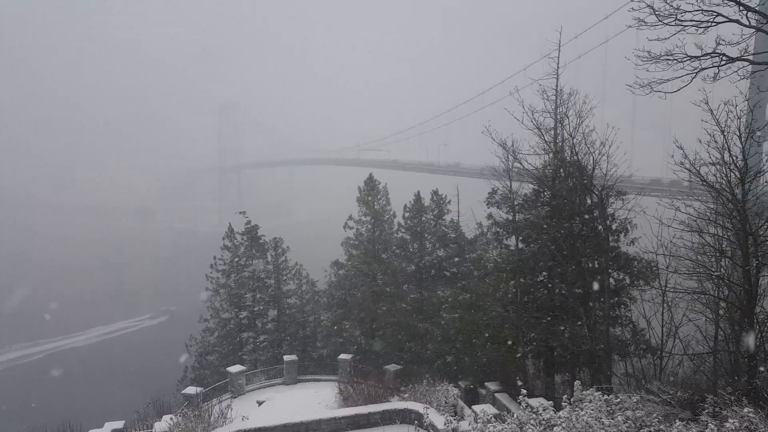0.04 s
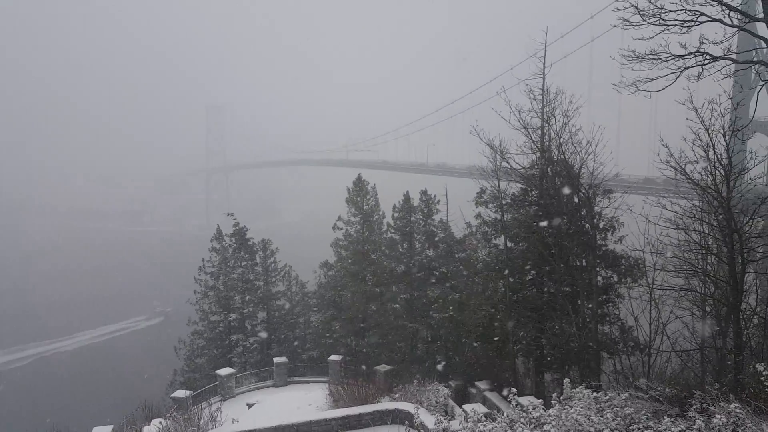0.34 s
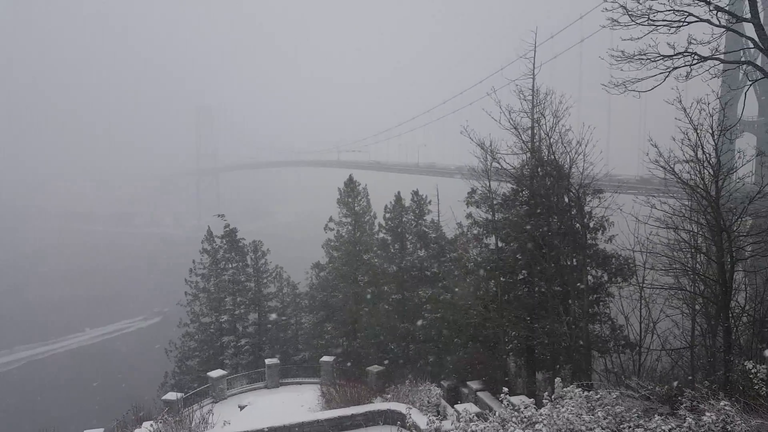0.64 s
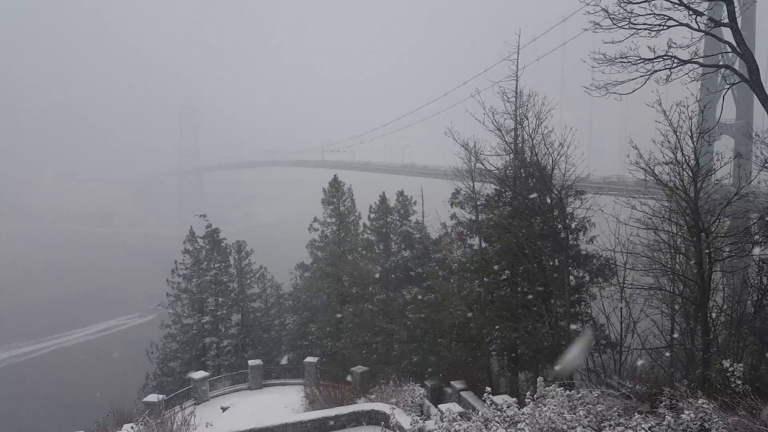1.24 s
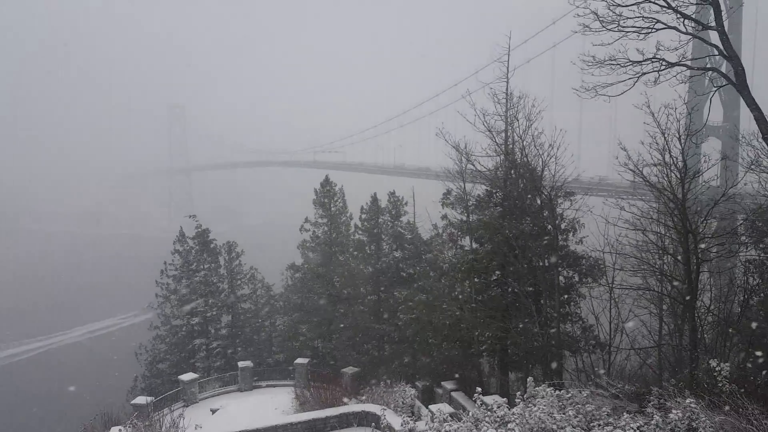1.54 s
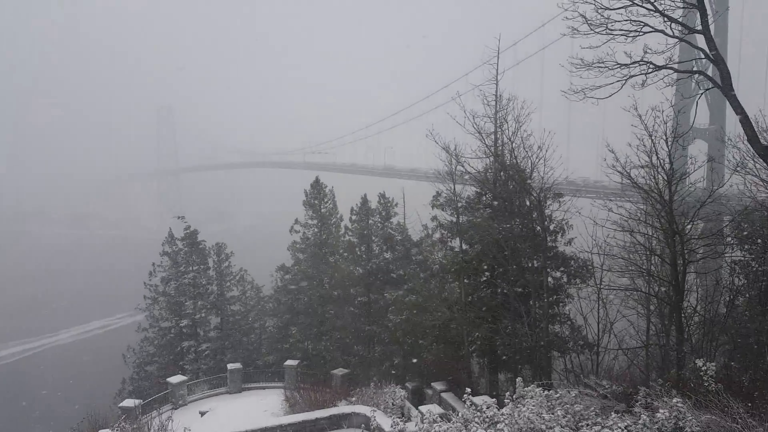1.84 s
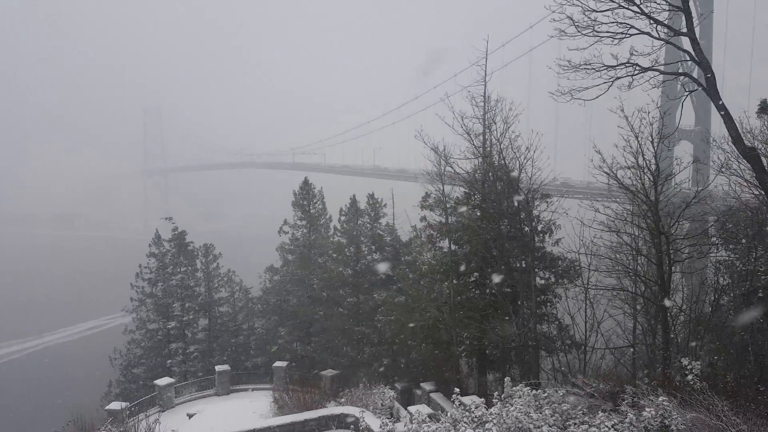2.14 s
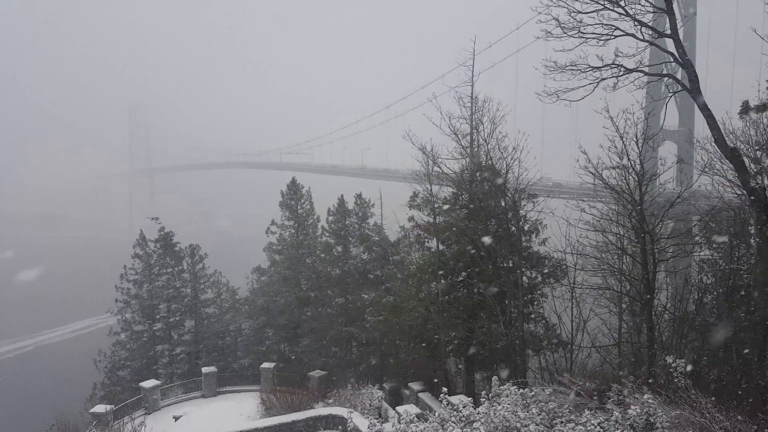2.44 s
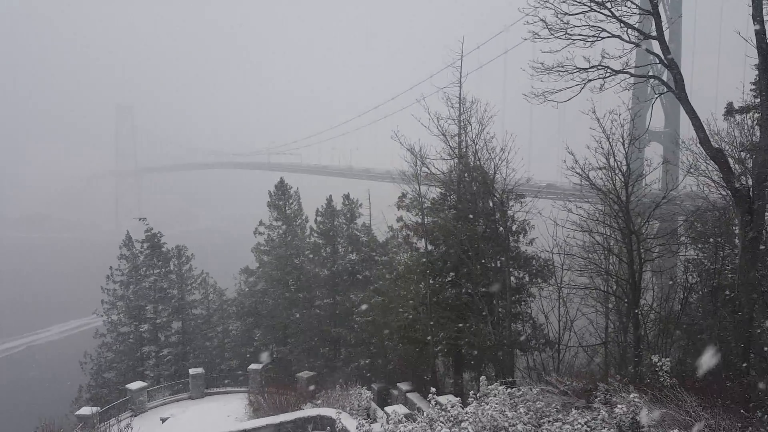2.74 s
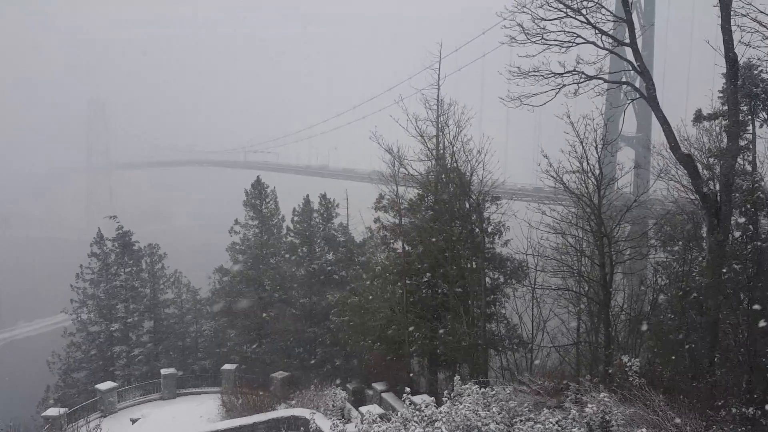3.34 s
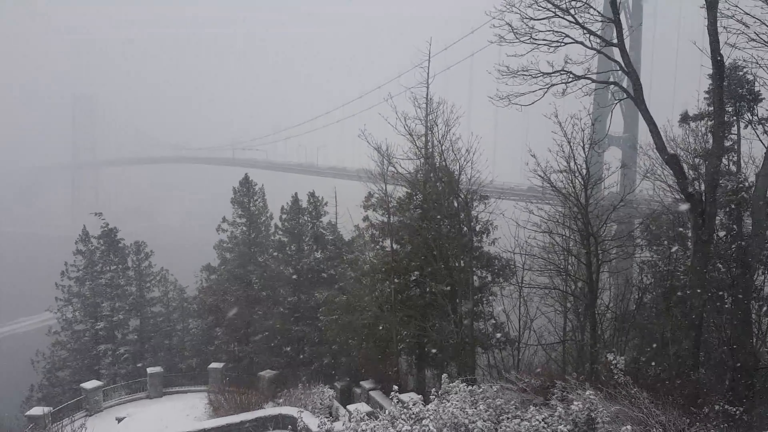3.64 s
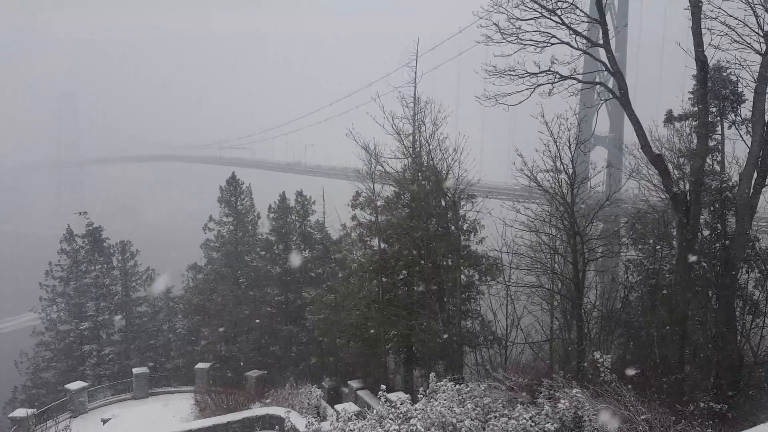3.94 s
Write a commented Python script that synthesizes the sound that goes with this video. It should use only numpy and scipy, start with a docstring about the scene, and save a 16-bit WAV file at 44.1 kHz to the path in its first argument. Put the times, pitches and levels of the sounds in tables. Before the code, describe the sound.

A ship's horn holds one low note from the start, grows fuller from about 1.2 seconds and stops near 2.4, leaving a faint shore echo. A low engine throb, rumbling wind and distant traffic run throughout. Snowflakes tick lightly close by, with soft rustles around 1, 2.3 and 3.6 seconds. Two faint, far whines, one sinking and one rising, pass between 2.4 and 3.4 seconds.

```python
"""A ship's horn holds one low note across a foggy inlet, swells and stops, leaving a faint shore echo.
The horn is a stack of pure tones; under it the ship's engine throbs on four low notes.
Close by, snowflakes tick as they land and something rustles softly three times.
Behind it all, wind and far bridge traffic make a wash of noise, with two faint whines near the end."""
import sys
import numpy as np
from scipy import signal
from scipy.fft import rfft, irfft
from scipy.io import wavfile
from scipy.ndimage import uniform_filter1d

SR = 44100
rng = np.random.default_rng(int(sys.argv[2]) if len(sys.argv) > 2 else 0)


def int16_out(signal):
    """Quantize to a 16-bit WAV file."""
    q = np.round(np.clip(np.atleast_2d(signal).T, -1, 1) * 32767)
    wavfile.write(sys.argv[1], SR, q.astype(np.int16))


N = 176400
T = np.arange(N) / SR

# The horn's note, steady until it sags as the air is shut off: time_s, pitch_hz
HORN_PITCH = [(0, 124.85), (1.35, 124.85), (1.55, 124.72), (2.3, 124.7), (2.37, 123.6), (2.5, 124.2)]
# Its harmonics (tones at 1, 2, 3... times the pitch): hollow_level_db, full_level_db
HORN_HARMONICS = [(-24.5, -30), (-29.5, -15.5), (-36.5, -29.5), (-38.5, -25), (-40.5, -31), (-38.5, -36.5),
                  (-49, -45), (-48, -60), (-53.5, -56), (-64.5, -51.5), (-59, -57), (-67.5, -57.5)]
# The tone fills out as the path over the water changes: time_s, fullness (0 hollow, 1 full)
HORN_FULLNESS = [(0, 0), (.7, 0.069), (1.05, 0.16), (1.27, 0.44), (1.5, 0.61), (1.75, 0.79), (2.0, 0.84),
                 (2.3, 0.9)]
# One harmonic dips as direct and reflected sound cancel: middle_s, pitch_hz, half_length_s, dip_db
HORN_DIPS = [(0.058, 750, .28, -12.5), (0.204, 375, 0.25, -13.5), (0.651, 500, 0.28, -10),
             (0.777, 250, 0.031, -15.5), (0.993, 875, 0.11, -11.5), (1.398, 375, 0.13, -5),
             (1.58, 625, .27, -12.5), (1.717, 750, 0.39, -13.5), (1.8, 875, 0.4, -7.5),
             (1.85, 1250, .15, -10), (2.444, 375, .06, -13.5)]

def horn():
    """Pure tones on one note; each wavers in the moving air, and the high ones die away first."""
    shut_s, closing_s, reflection_s = 2.315, .085, .095
    cycles = np.cumsum(curve(HORN_PITCH)) / SR
    fullness, note_hz = curve(HORN_FULLNESS), HORN_PITCH[0][1]
    # The direct sound stops first; a reflection carries on a moment longer.
    shut = np.clip((T - shut_s) / closing_s, 0, 1)
    dying_s = np.maximum(T - shut_s - reflection_s, 0)
    out = np.zeros(N)
    for k, (hollow_db, full_db) in enumerate(HORN_HARMONICS, 1):
        hz = k * note_hz
        db = hollow_db + (full_db - hollow_db) * fullness
        db += (.3 + .0008 * hz) * wander(5)
        for middle_s, dip_hz, half_length_s, dip_db in HORN_DIPS:
            if round(dip_hz / note_hz) == k:
                db += dip_db * np.exp(-((T - middle_s) / half_length_s) ** 2)
        drop_db, fade_db_per_s = 1.2 + .014 * hz, 70 + .28 * hz
        db -= shut * drop_db + dying_s * fade_db_per_s
        phase = 2 * np.pi * (k * cycles + rng.random())
        waver = .06 * np.sqrt(k) * wander(2.6)
        out += amp(db) * np.sqrt(2) * np.sin(phase + waver)
    return out


def shore_echo(sound, level_db=-29, fade_s=2.5):
    """The wooded shore sends back a faint echo that falls 60 dB in fade_s."""
    tail = rng.standard_normal(N) * amp(-60 * T / fade_s)
    return amp(level_db) * signal.fftconvolve(sound, tail / np.linalg.norm(tail))[:N]


# The engine's notes: pitch_hz, throb_rate_hz, base_level_db
ENGINE_NOTES = [(97.1, 2.5, -35.5), (143.4, 6, -30.5), (157.4, 3.4, -40), (193, 5, -39.5)]
# How they swell and sink together: time_s, gain_db
ENGINE_SWELL = [(0, -10), (.25, 3), (.75, 5.5), (1.3, 5), (1.6, -0.5), (1.85, -6), (2.0, -2), (2.3, -2),
                (2.57, -0.5), (2.67, 0.5), (3.25, 1), (3.35, 8), (3.46, -8.5), (3.58, -2), (3.67, -3),
                (4, 2)]

def engine(steady_share=.45):
    """The turning engine drones on low notes, part steady and part throbbing at random."""
    out = np.zeros(N)
    for hz, throb_hz, db in ENGINE_NOTES:
        throb = evened(wander(throb_hz) + 1j * wander(throb_hz))  # shakes both level and phase
        strength = np.sqrt(steady_share) + np.sqrt(1 - steady_share) * throb
        note = strength * np.exp(2j * np.pi * (hz * T + rng.random()))
        out += amp(db) * evened(note.real)
    return out * amp(curve(ENGINE_SWELL))


# The flakes that land clearly: start_s, level_db (before SNOW_TONE)
SNOW_TICKS = [(1.286, -33.5), (1.532, -44), (1.574, -53), (1.593, -54), (1.636, -44), (1.763, -44.5),
              (2.859, -50), (2.96, -39), (3.3675, -38), (3.385, -42), (3.7616, -29.5)]
# The bright tone of every tick: frequency_hz, gain_db
SNOW_TONE = [(500, -6), (2500, 11), (4200, 12), (6500, 8), (9000, 9), (12000, 2), (16000, 1)]

def snow(crumble_s=.0006, faint_per_s=6, faint_db=-59):
    """Flakes strike something close by: a few snap and crumble clearly among many faint ticks."""
    t, out = T[:400], np.zeros(N)
    for start_s, db in SNOW_TICKS:
        snap = t == 0
        crumble = .2 * rng.standard_normal(len(t)) * np.exp(-t / crumble_s)
        tick = snap + crumble
        add(out, start_s, amp(db) * tick / np.linalg.norm(tick))
    out += amp(faint_db) * rng.standard_normal(N) * (rng.random(N) < faint_per_s / SR)
    return coloured(out, SNOW_TONE)


# Soft brushes in three groups: start_s, rise_s, decay_s, level_db (before the grain)
BRUSHES = [(1.03, 0.0045, 0.015, -53.5), (1.066, .01, 0.046, -45.5), (2.296, 0.0024, 0.029, -48.5),
           (2.338, .008, 0.075, -52), (3.542, 0.013, 0.024, -52), (3.567, .017, 0.029, -45),
           (3.64, .03, 0.1, -56.5)]
# Their tone: frequency_hz, relative_db
BRUSH_TONE = [(400, -22), (1500, 6), (3000, 7.5), (5200, 0.5), (6500, -8.5), (7600, -10), (9000, -17),
              (10600, -17.5), (11600, -32), (16000, -50)]

def rustles(grain_db=2.5):
    """Short brushes of noise, as of a coat sleeve; a fast flutter in level makes them grainy."""
    level = np.zeros(N)
    for start_s, rise_s, decay_s, db in BRUSHES:
        rise = np.minimum(T / rise_s, 1)
        decay = np.exp(-np.maximum(T - rise_s, 0) / decay_s)
        add(level, start_s, amp(db) * rise * decay)
    return level * noise(BRUSH_TONE) * amp(grain_db * wander(200))


# The rumble's tone: frequency_hz, relative_db
RUMBLE_TONE = [(15, -43.5), (30, -39.5), (60, -22.5), (85, -12.5), (120, 0), (165, 4.5), (215, -2.5),
               (300, -4.5), (420, -17), (800, -64)]
# Its loudness: time_s, level_db
RUMBLE_SWELL = [(0, -36), (.4, -33), (1.4, -32), (1.8, -32.5), (2.3, -35), (2.55, -37.5), (3.2, -35.5),
                (3.35, -31), (3.5, -35), (4, -39.5)]

def rumble():
    """The wind's low rumble rises and falls."""
    return noise(RUMBLE_TONE) * amp(curve(RUMBLE_SWELL))


# The deep tone of the gusts: frequency_hz, relative_db
GUST_TONE = [(15, -10), (30, -12), (55, -2), (80, 6.5), (100, 5.5), (140, -17.5), (400, -69.5)]
# Their loudness: time_s, level_db
GUST_SWELL = [(0, -39), (.2, -44), (.9, -43.5), (1.5, -40), (1.8, -50.5), (2.0, -41), (2.35, -37),
              (2.55, -54), (3.15, -56), (3.36, -39), (3.48, -54), (3.65, -43), (4, -54)]

def gusts():
    """Wind buffets the listener with surges of deep noise."""
    return noise(GUST_TONE) * amp(curve(GUST_SWELL))


# The tone of wind and far traffic: frequency_hz, relative_db
WASH_TONE = [(30, -11.5), (250, -1.5), (450, -1), (560, 2), (720, 3.5), (950, 0), (1130, -6), (1380, -2.5),
             (1650, -8.5), (1950, -7), (2400, -11), (2900, -18.5), (3500, -20), (5000, -35), (7000, -41.5),
             (15500, -58.5)]
# Their loudness: time_s, level_db
WASH_SWELL = [(0, -39), (1.3, -39.5), (1.7, -42), (2.2, -39.5), (2.55, -41.5), (3.2, -40), (3.6, -41),
              (4, -41.5)]

def wind_and_traffic(patch_db=1.5):
    """Wind and far traffic blend into a wash of noise with drifting louder and softer patches."""
    grid = signal.stft(noise(WASH_TONE), nperseg=1024, noverlap=768)[2]
    patches = uniform_filter1d(rng.standard_normal(grid.shape), size=10, axis=0)  # smooth over pitch
    patches = evened(uniform_filter1d(patches, size=22, axis=1))  # smooth over time
    wash = signal.istft(grid * amp(patch_db * patches), nperseg=1024, noverlap=768)[1][:N]
    return evened(wash) * amp(curve(WASH_SWELL))


# One whine sinks, the next rises: start_s, length_s, start_hz, end_hz, level_db
FAR_WHINES = [(2.4, .55, 662, 628, -46), (2.92, .45, 690, 875, -49)]

def whines(waver_hz=3):
    """Thin, unsteady far tones, perhaps tyres on the bridge."""
    out = np.zeros(N)
    for start_s, length_s, start_hz, end_hz, db in FAR_WHINES:
        progress = np.clip((T - start_s) / length_s, 0, 1)
        hz = start_hz + (end_hz - start_hz) * progress + waver_hz * wander(12)
        swell = np.sqrt(abs(np.sin(np.pi * progress)))
        out += amp(db) * swell * np.sin(2 * np.pi * np.cumsum(hz) / SR)
    return out


# The tone of the hiss: frequency_hz, relative_db
HISS_TONE = [(500, -8), (3000, 2), (4200, 1.5), (5500, -3.5), (7000, -15.5), (10500, -22.5), (14000, -15.5),
             (16000, -14)]

def hiss(level_db=-61.5):
    """A fine, steady hiss lies under everything."""
    return amp(level_db) * noise(HISS_TONE)


def amp(db):
    """Turns decibels into a multiplier."""
    return 10 ** (np.asarray(db) / 20)


def evened(x):
    """Scales a signal to an average size (rms) of 1."""
    return x / np.sqrt(np.mean(abs(x) ** 2) + 1e-20)


def curve(points):
    """Joins (time, value) points with straight lines."""
    return np.interp(T, *np.transpose(points))


def coloured(x, tone):
    """Turns each frequency up or down as a tone table says."""
    hz, db = np.transpose(tone)
    gain_db = np.interp(np.log(np.fft.rfftfreq(N, 1 / SR) + 1), np.log(hz), db)
    return irfft(rfft(x) * amp(gain_db), N)


def noise(tone):
    """Noise of average size 1 with the given tone."""
    return evened(coloured(rng.standard_normal(N), tone))


def wander(rate_hz):
    """A random drift of average size 1, mostly slower than rate_hz."""
    hz = np.fft.rfftfreq(N, 1 / SR)
    spectrum = rfft(rng.standard_normal(N)) * (hz > 0) / (1 + (hz / rate_hz) ** 2)
    return evened(irfft(spectrum, N))


def add(mix, start_s, sound):
    """Mixes a sound in at start_s."""
    part = mix[round(start_s * SR):][:len(sound)]
    part += sound[:len(part)]


def scene():
    """The ship, the small near sounds and the background, in one channel."""
    blast = horn()
    ship = blast + shore_echo(blast) + engine()
    background = wind_and_traffic() + rumble() + gusts() + hiss() + whines()
    return (ship + snow() + rustles() + background)[None]


def record(dry, fade_s=.004, cutoff_hz=15850):
    """Softens both ends and cuts the very highest treble."""
    ends = np.clip(np.minimum(T, T[::-1]) / fade_s, 0, 1)
    low_pass = signal.firwin(511, cutoff_hz, window=("kaiser", 9), fs=SR)
    return signal.oaconvolve(dry * ends, low_pass[None], "same")


dry = scene()
out = record(dry)
int16_out(out)
```